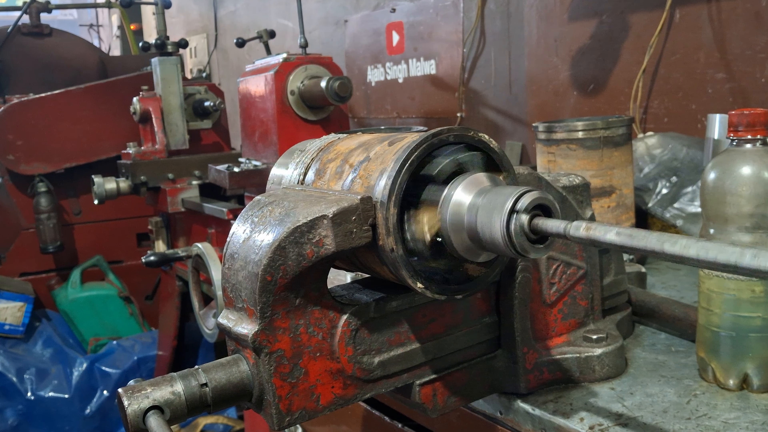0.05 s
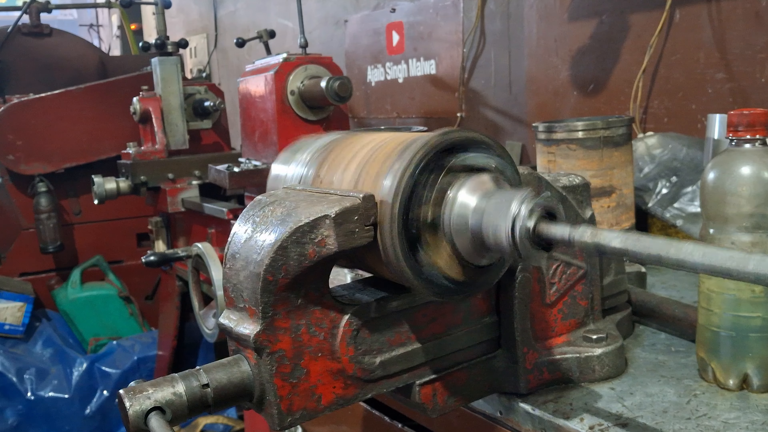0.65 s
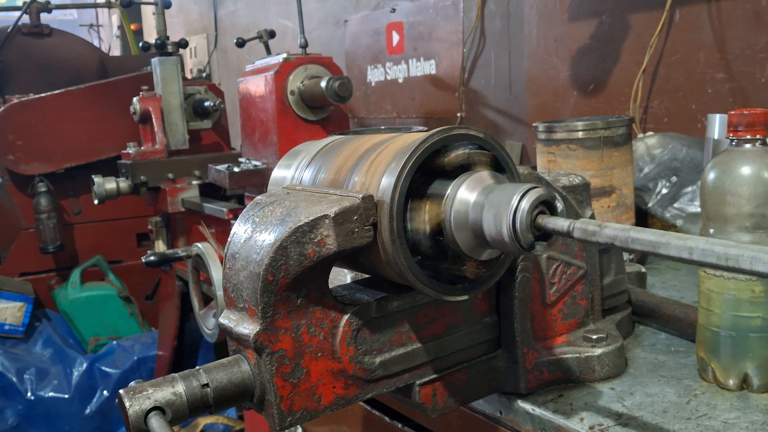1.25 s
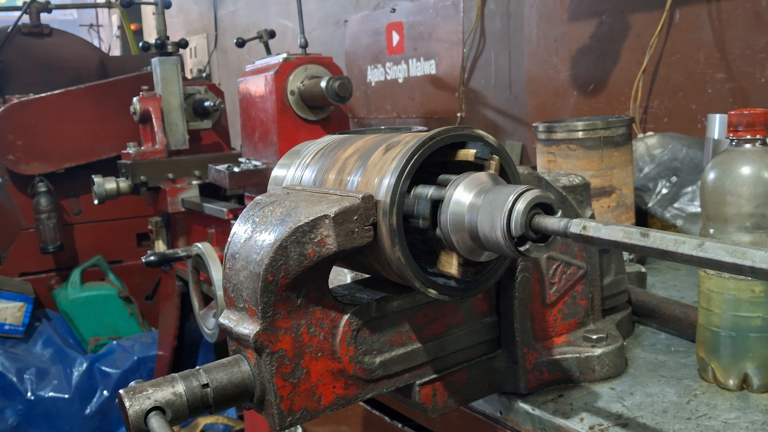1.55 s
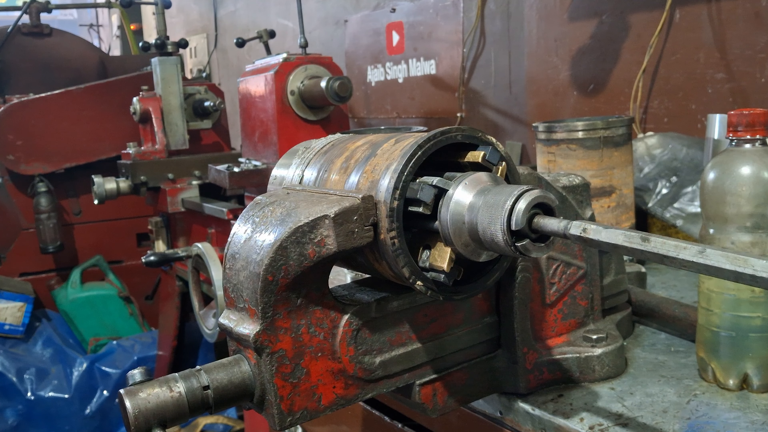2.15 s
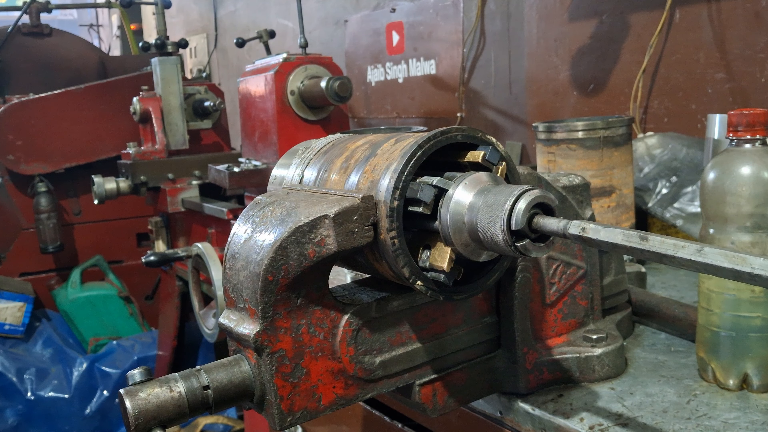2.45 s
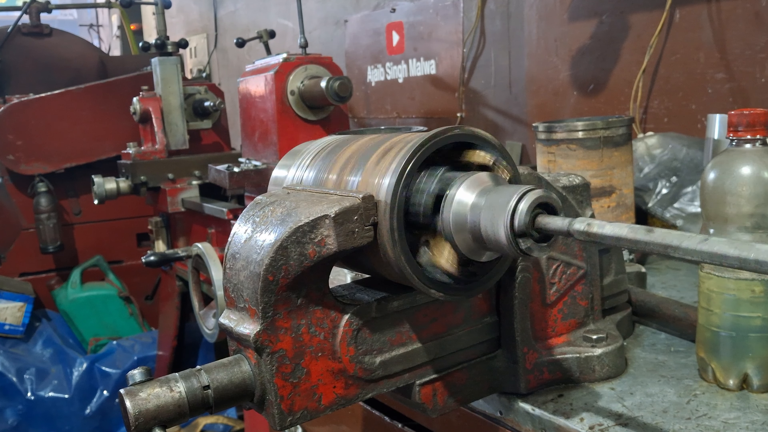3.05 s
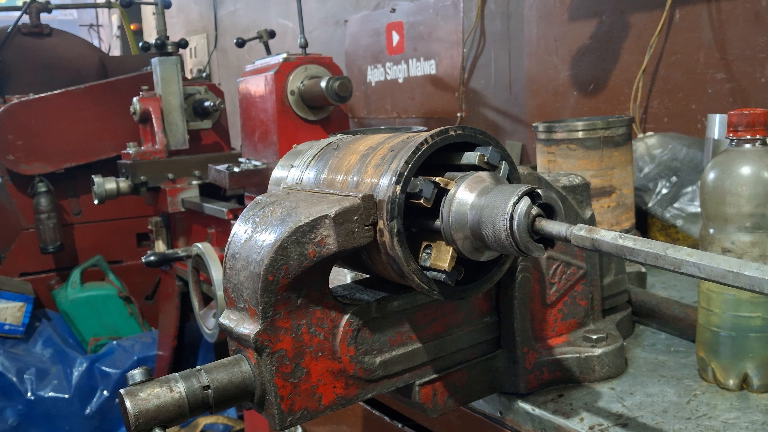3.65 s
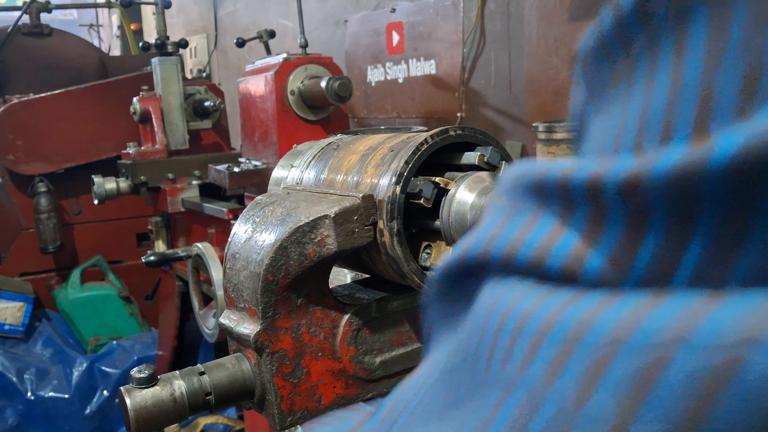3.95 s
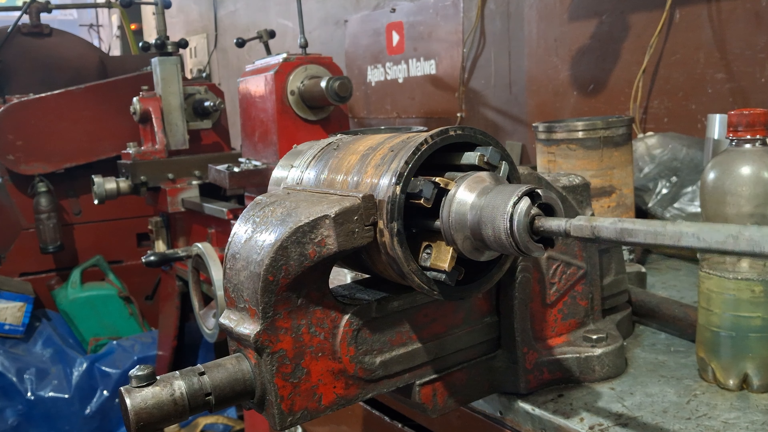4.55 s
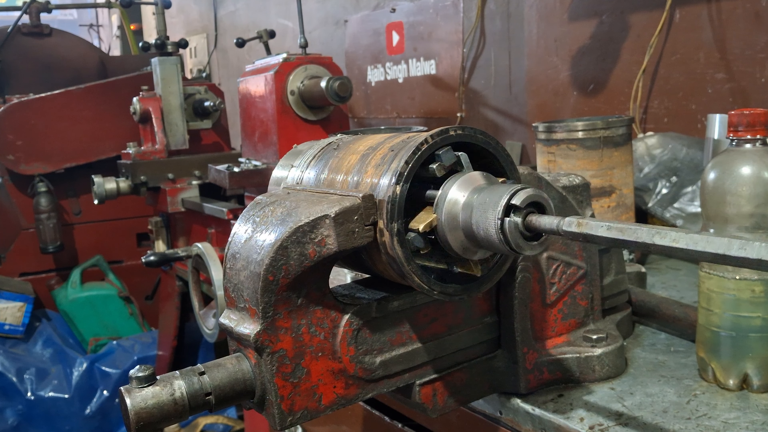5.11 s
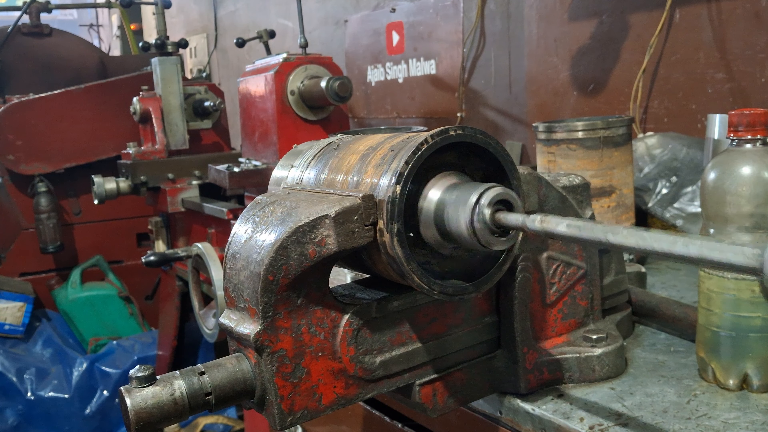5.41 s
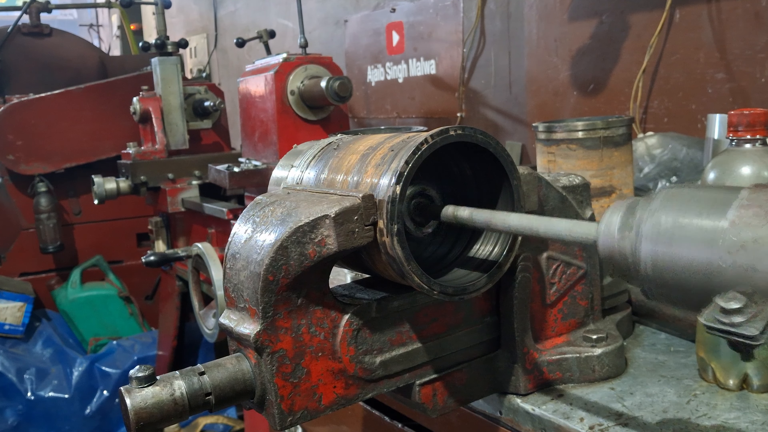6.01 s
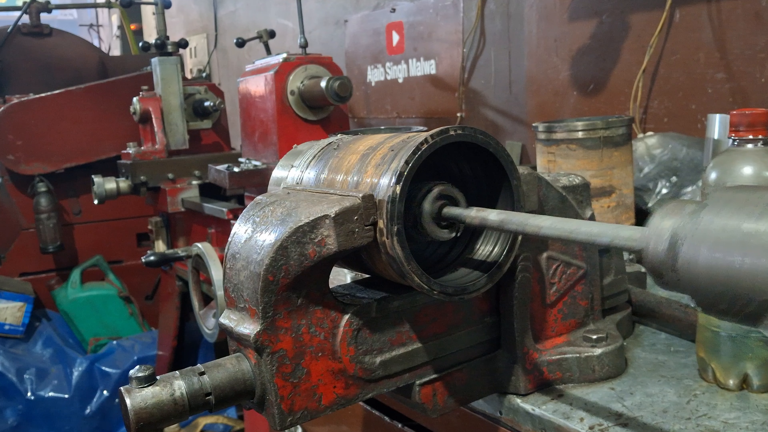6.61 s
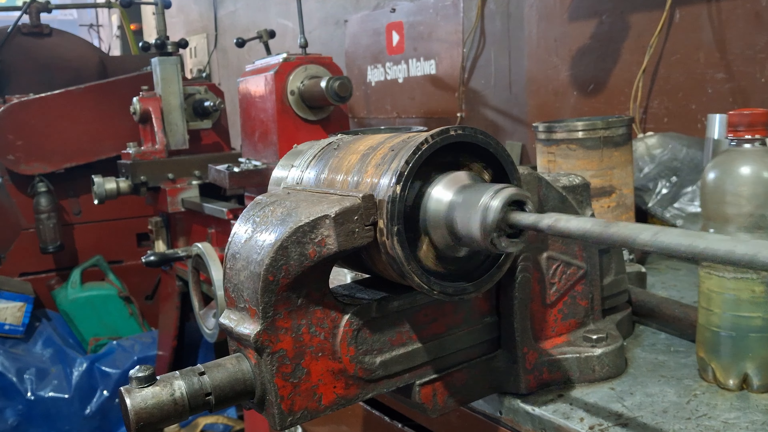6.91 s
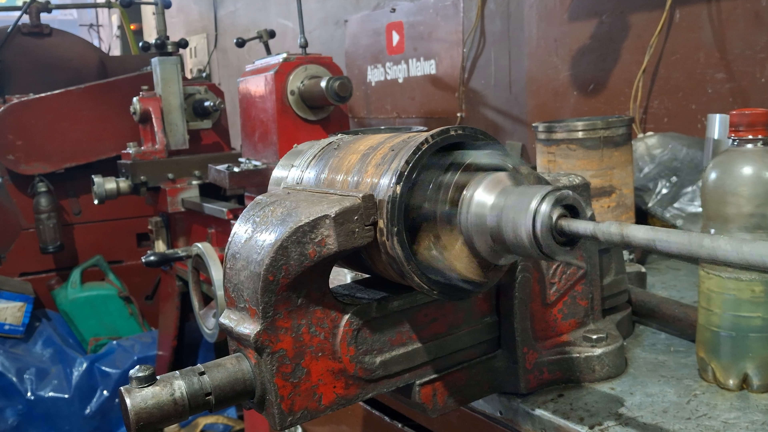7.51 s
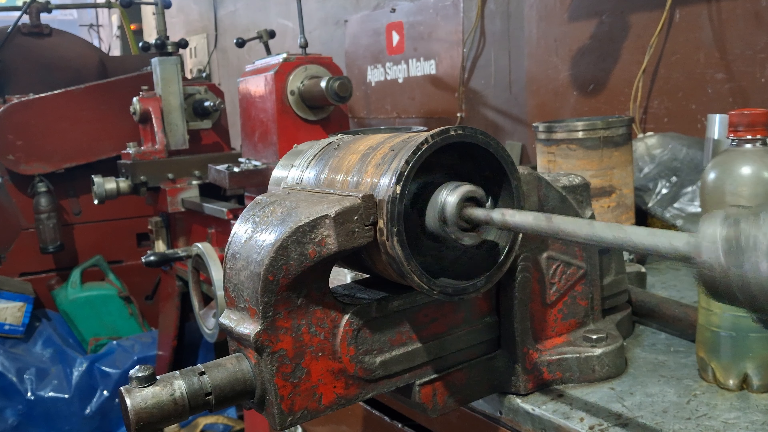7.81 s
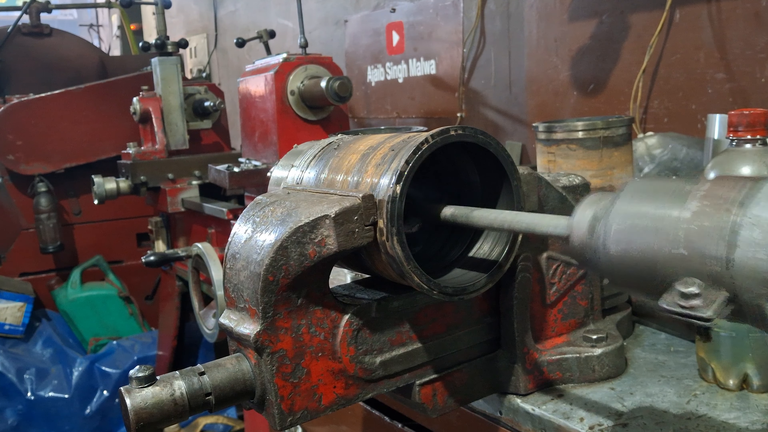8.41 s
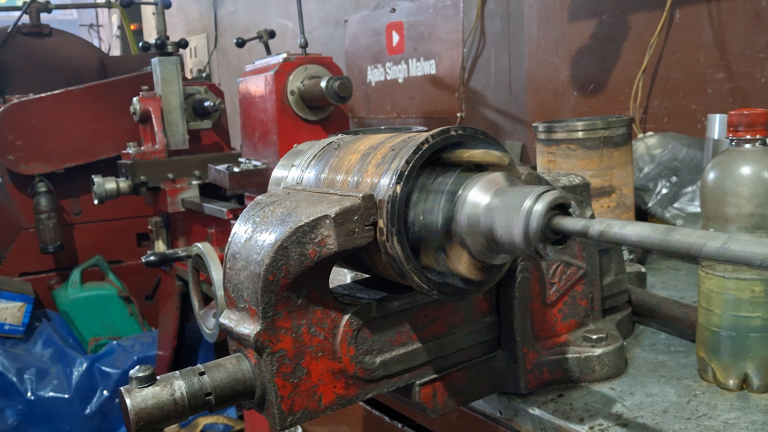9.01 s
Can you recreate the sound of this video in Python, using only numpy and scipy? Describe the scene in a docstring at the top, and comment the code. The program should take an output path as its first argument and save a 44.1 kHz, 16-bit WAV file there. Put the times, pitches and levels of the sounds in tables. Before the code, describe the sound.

Close up in a small workshop, a drill drives a hone through a metal cylinder, mixing gear whine with rasping grit. One short run coasts down, then come two quick blips, with light knocks, a faint distant whir and a shirt bumping the microphone between them. A long final run pulses rapidly, rising in pitch as the load eases and ringing more when the hone reaches the mouth.

```python
"""A drill whines up to speed, grinding an abrasive hone round a cylinder sleeve held in a vice.
One run and two short blips lead to a long run, stroked in and out. Meshing teeth make the whine;
grit scratches the bore and sets the sleeve ringing; once a turn the stones bind and pull the speed down.
In the pauses the tool knocks lightly, a shirt brushes the microphone and a far machine whirs
over the hum of the small workshop."""
import sys
import numpy as np
from scipy import signal
from scipy.fft import rfft, irfft, next_fast_len
from scipy.io import wavfile

SR = 44100
rng = np.random.default_rng(int(sys.argv[2]) if len(sys.argv) > 2 else 0)


def bounce(signal):
    """Save signal as a 16-bit WAV file at the path given by the first command-line argument."""
    frames = np.transpose(np.atleast_2d(signal))
    limited = np.clip(frames, -1, 1)
    pcm = np.round(limited * 32767).astype(np.int16)
    wavfile.write(sys.argv[1], SR, pcm)


N = 408366
TIME = np.arange(N) / SR
WORKING_SPEED = 121.3  # of the armature under load [turns/s]

# the sleeve rings most with the hone at its mouth: (time [s], relative ringing level [dB])
MOUTH_RINGING = [(0, 0), (.8, 0), (1.45, -4), (2.9, 4.5), (5.0, 0.5), (5.45, 1), (5.9, -4), (6.5, -17),
                 (7.2, -3), (7.6, -3), (8.2, -12), (8.6, -5), (9.2, -2.5)]


def from_db(db):
    """Amplitude ratio of a level in decibels."""
    return 10 ** (np.asarray(db) / 20)


def rms_one(x):
    """Normalisation to unit power."""
    return x / np.sqrt(np.mean(x ** 2) + 1e-20)


def read_curve(points, x):
    """Linear interpolation between (x, value) points."""
    return np.interp(x, *np.transpose(points))


def at_hz(points, hz):
    """Interpolation of a spectrum on a log-frequency axis."""
    f, value = np.transpose(points)
    return np.interp(np.log(np.maximum(hz, 1)), np.log(np.maximum(f, 1)), value)


def coloured(x, spectrum):
    """Zero-phase filtering by a curve of (frequency [Hz], gain [dB])."""
    size = next_fast_len(N + 4096)
    gain = from_db(at_hz(spectrum, np.fft.rfftfreq(size, 1 / SR)))
    return irfft(rfft(x, size) * gain, size)[..., :N]


def noise(spectrum, shape=N):
    """Filtered Gaussian noise of unit power; shape (2, N) gives two incoherent channels."""
    return rms_one(coloured(rng.standard_normal(shape), spectrum))


def drift(rate_hz):
    """Random modulation of unit variance, interpolated between rate_hz values a second."""
    knots = rng.standard_normal(8192)
    return np.interp(TIME * rate_hz, np.arange(len(knots)), knots) * np.sqrt(3 / 2)


def resonate(x, hz, width_hz):
    """Resonance: two like band-pass stages in cascade, each width_hz wide with unit peak gain."""
    r = np.exp(-np.pi * width_hz / SR)
    b = np.array([1, 0, -1]) * (1 - r * r) / 2
    a = [1, -2 * r * np.cos(2 * np.pi * hz / SR), r * r]
    return signal.lfilter(b, a, signal.lfilter(b, a, x))


def decay(start, t60):
    """Exponential damping: 60 dB lost every t60 seconds."""
    return (TIME >= start) * from_db(-60 * np.clip((TIME - start) / t60, 0, 3))


def swell(start, length_s, attack_s, release_s):
    """Envelope with linear attack, hold and exponential release."""
    attack = np.clip((TIME - start) / attack_s, 0, 1)
    return attack * np.exp(-np.clip((TIME - start - length_s) / release_s, 0, 20))


def swells(rows, attack_s, release_s):
    """Incoherent events add in power; each row is (time [s], duration [s], level [dB])."""
    powers = ((from_db(db) * swell(s, length, attack_s, release_s)) ** 2 for s, length, db in rows)
    return np.sqrt(sum(powers))


def from_right(x, lag_s=.0005):
    """Path difference: sound from the right reaches the left microphone later."""
    return np.array([np.interp(TIME - lag_s, TIME, x), x])


def workshop(x, t60, room_db):
    """Reverberation: cluttered walls add a dense, decaying tail to the direct sound."""
    age = TIME[:SR // 2]
    tail = rng.standard_normal((2, len(age))) * from_db(-60 * age / t60) * (age > .003)
    tail /= np.sqrt(np.sum(tail ** 2, axis=1, keepdims=True))
    return from_right(x) + from_db(room_db) * signal.fftconvolve(x[None], tail, axes=1)[:, :N]


def background(hum_hz=98):
    """Ambient sound: a far machine, electric hum and room noise from the right, plus a diffuse field."""
    # room noise: (frequency [Hz], relative level [dB])
    room_spectrum = [(15, -33), (25, -3.5), (107, -6), (173, -42), (240, -12), (313, -26.5), (433, -12.5),
                     (482, -7.5), (537, -19.5), (1450, -23.5), (1950, -22), (2920, -42.5), (15500, -49.5)]
    machine = far_machine()
    hum = from_db(-66.5 + 2.5 * drift(8)) * np.sin(2 * np.pi * hum_hz * TIME)
    direct = from_right(machine + hum + from_db(-59.5) * noise(room_spectrum))
    return direct + from_db(-61.5) * noise(room_spectrum, (2, N))


def far_machine(hz=233):
    """Two harmonics, randomly modulated in frequency and amplitude, make a passing whir."""
    phase = 2 * np.pi * np.cumsum(hz * (1 + .017 * drift(60))) / SR
    level = from_db(-53.5 + 3.5 * drift(30)) * swell(3.3, 1.4, attack_s=.12, release_s=.65)
    return level * (from_db(-2.5) * np.sin(phase) + np.sin(2 * phase))


def shuffling(attack_s=.083, release_s=.15):
    """Friction noise of someone shifting about: a mono rumble and a stereo rustle of cloth."""
    # movements: (time [s], duration [s], relative rustle level [dB], rumble level [dB])
    moves = np.array([(2.058, 0.72, -78, -51), (2.383, 0.16, -57, -43.5), (2.535, 0.092, -56.5, -46.5),
                      (2.713, .09, -63, -43), (3.266, 0.23, -62.5, -46), (3.613, 0.75, -75, -52),
                      (4.19, 0.05, -51.5, -41), (4.393, 0.11, -50.5, -35.5), (4.54, 0.18, -55.5, -43.5)])
    # rubbing cloth: (frequency [Hz], relative level [dB])
    cloth_spectrum = [(350, -39), (600, -5), (993, -8), (1990, -5), (2610, -10), (3110, -9.5),
                      (10400, -15.5), (15500, -11.5)]
    rumble = from_db(-61) + swells(moves[:, [0, 1, 3]], attack_s, release_s)
    rumble *= noise([(25, -16.5), (60, 7.5), (110, .5), (200, -9), (450, -9), (800, -20.5),
                     (3000, -45.5)])
    rustle = from_db(-72) + swells(moves[:, :3], attack_s, release_s)
    crinkle = from_db(9 + 2 * drift(45))
    return rumble, rustle * crinkle * noise(cloth_spectrum, (2, N))


def tool_knocks():
    """Damped impacts of the resting tool: a dull knock outlasts a bright tick."""
    # impacts: (time [s], knock level [dB], tick level [dB])
    impacts = [(2.035, -35, -67), (2.277, -42, -70), (2.422, -36.5, -62), (3.379, -42, -42),
               (4.427, -36.5, -34)]
    # dull knock: (frequency [Hz], relative level [dB])
    knock_spectrum = [(100, -21), (300, 5.5), (520, 3.5), (900, -1), (1400, -5), (2000, -15), (2800, -15.5),
                      (5000, -25), (12000, -67)]
    tick_spectrum = [(500, -16), (2000, 4), (7000, -7.5), (15000, -8)]
    knocks = sum(from_db(db) * decay(s, t60=.41) for s, db, _ in impacts)
    ticks = sum(from_db(db) * decay(s, t60=.074) for s, _, db in impacts)
    return knocks * noise(knock_spectrum) + ticks * noise(tick_spectrum)


def tool_scrape():
    """Sliding friction of the resting tool gives a short band of noise."""
    band = rms_one(resonate(rng.standard_normal(N), hz=3100, width_hz=800))
    return from_db(-45) * swell(2.38, .11, attack_s=.017, release_s=.015) * band


def handling():
    """Superposition of reverberant tool noises and rumble with the direct rustle of clothes."""
    tool = tool_knocks() + tool_scrape()
    rumble, rustle = shuffling()
    return workshop(tool + rumble, t60=.5, room_db=-8.5) + rustle


def shirt(left_db=-31, attack_s=.004, lowest_hz=42):
    """Air displacement: cloth bumps the right microphone with a damped low thump and a scuff."""
    # bumps: (time [s], thump level [dB], frequency [Hz], 60 dB decay time [s], scuff level [dB])
    bumps = [(4.218, -0.5, 84, 0.054, -24), (4.241, 6, 60, 0.0092, -17), (4.252, 1, 102, 0.056, -55),
             (4.44, -19, 112, 0.11, -43)]
    scuff = noise([(200, -.5), (600, -3), (1500, -16), (6000, -21), (15000, -25)])
    pressure = np.zeros(N)
    for start, thump_db, hz, t60, scuff_db in bumps:
        age = TIME - start
        thump = from_db(thump_db) * decay(start, t60) * np.clip(age / attack_s, 0, 1)
        rub = from_db(scuff_db) * decay(start, t60=.056) * np.clip(age / attack_s + .44, 0, 1)
        pressure += rub * scuff - thump * np.sin(2 * np.pi * hz * age)
    highpass = signal.butter(2, lowest_hz, "high", fs=SR, output="sos")
    return signal.sosfilt(highpass, pressure) * from_db([[left_db], [0]])


def bench_drone(effort, shudder, drone_db):
    """Forced vibration: the bench drones with the grinding and with its own brief shudders."""
    # bench vibration: (frequency [Hz], relative level [dB])
    bench_spectrum = [(25, -25), (55, -12), (80, 0), (97, 7.5), (118, -0.5), (170, -19.5), (400, -61)]
    return np.hypot(effort * from_db(drone_db), shudder) * from_db(-1.5) * noise(bench_spectrum)


def vice_shake(effort, shudder):
    """Forced vibration: half out of the bore, the hone shakes the vice."""
    drive = effort * from_db(2 * read_curve(MOUTH_RINGING, TIME) - 17)
    rumble = noise([(22, -26), (42, -9.5), (62, 2.5), (110, -14), (220, -6.5), (500, -31.5)])
    return np.hypot(drive, shudder * from_db(-7.5)) * rumble


def drive_growl(speed, effort, growl_db):
    """Speed-dependent noise: the drive growls when it labours or races."""
    # strain on the drive: (armature speed [turns/s], relative level [dB])
    strain = [(12, 6), (30, 0), (55, 1.5), (80, -10.5), (105, -13), (122, -11.5), (148, -4.5)]
    # growl: (frequency [Hz], relative level [dB])
    growl_spectrum = [(25, -24.5), (60, -2.5), (170, -4.5), (350, 1.5), (520, 9.5), (700, -0.5), (950, 0.5),
                      (1300, 8), (2500, -25)]
    return effort * from_db(read_curve(strain, speed) + growl_db + 2.5) * noise(growl_spectrum)


def spin(goal, start, release, rise_s, braking, creep_speed=30):
    """Inertia: the rotor nears its goal exponentially; released, it brakes evenly and creeps to rest."""
    driven = goal * (1 - np.exp(-np.maximum(TIME - start, 0) / rise_s))
    coasting = np.interp(release, TIME, driven) - braking * (TIME - release)
    creeping = creep_speed * np.exp(np.clip(coasting / creep_speed - 1, -20, 0))
    return np.where(TIME < release, driven, np.maximum(coasting, creeping))


def motor():
    """Less load, more speed: gives armature speed, its rise from eased load and the pull in force."""
    # trigger pulls: (start [s], release [s], rise time [s], braking [turns/s^2], time of least
    # binding [s], speed swing [ratio], gear swell [dB], relative whine, growl and drone levels [dB])
    pulls = [(.03, .89, .103, 203, .4185, .048, 2.5, -.5, 1, -15),
             (2.812, 2.975, .073, 335, 2.97, .003, .5, .5, 3, -11),
             (4.847, 5.0, .072, 420, 4.99, .003, .5, 2.5, -1, -10),
             (5.245, 9.4, .085, 300, 5.9441, .028, 4.2, -.5, -1, -19)]
    # the load eases: (time [s], speed gained [turns/s], half duration [s])
    easings = [(.87, 36, .115), (6.438, 25.7, .318), (7.566, 6.9, .216), (8.481, 21.9, .251)]
    ease = sum(gain * np.exp(-((TIME - s) / length) ** 2) for s, gain, length in easings)
    speeds = np.array([spin(WORKING_SPEED + ease, *pull[:4]) for pull in pulls])
    return speeds.max(axis=0), ease, np.array(pulls)[speeds.argmax(axis=0)].T


def grinding_effort(speed, powered, grip_speed=44.7, grip_range=8.6, surge_db=18.5):
    """Friction noise follows speed and surges as the stones grip on run-up; brief rises add in power."""
    # steady grinding: (armature speed [turns/s], level [dB])
    grind_law = [(1, -95), (4, -78), (8, -64), (14, -54), (30, -42.5), (45, -35), (60, -32), (90, -29),
                 (120, -26.7), (150, -27.3)]
    # brief rises in the drill's noise (opening hum, start-up jerks, stone catches, swells under load):
    # (time [s], duration [s], level [dB])
    rises = [(0, .05, -45), (.053, 0.019, -31.5), (.093, .02, -42), (.19, 0.016, -21), (.275, 0.045, -22),
             (.39, 0.015, -25.5), (.49, .15, -32.5), (1.425, 0.031, -35.5), (2.832, 0.023, -40),
             (2.945, 0.14, -27), (3.113, 0.031, -26), (4.862, 0.022, -37), (4.965, 0.059, -26),
             (5.04, 0.074, -26), (5.25, .04, -38), (5.42, .1, -26.5), (6.68, .17, -37), (7.62, .2, -38.5),
             (8.66, 0.18, -31.5)]
    grip = np.clip((speed - grip_speed) / grip_range, 0, 1)
    surge = powered * grip * np.clip(1 - speed / WORKING_SPEED, 0, 1)
    grind = from_db(read_curve(grind_law, speed) + surge_db * surge)
    return np.hypot(grind, swells(rises, attack_s=.0023, release_s=.0075))


def squeals(half_length_s=.013):
    """Stick-slip at the sleeve's mouth briefly drives a high mode."""
    # squeals of a catching stone: (time [s], level [dB])
    slips = [(.205, -39), (2.922, -24), (3.052, -22), (4.94, -20), (4.983, -23), (5.05, -20.5)]
    envelope = sum(from_db(db) * np.exp(-((TIME - s) / half_length_s) ** 2) for s, db in slips)
    return envelope * rms_one(resonate(rng.standard_normal(N), hz=4320, width_hz=140))


def stones(effort, load_db, grit_db=8, flutter_db=1.07, grain_db=1, judder_db=7.5):
    """Abrasion: grit tears tiny scratches in the bore, and juddering stones excite the sleeve's modes."""
    # scratching grit: (frequency [Hz], relative level [dB])
    grit_spectrum = [(300, -40.5), (1020, -4), (1380, -4.5), (1700, 6.5), (2200, 6), (2700, -0.5),
                     (3300, -2), (3900, 0), (5000, -3.5), (6500, -6), (9000, -8.5), (11500, -6.5),
                     (13000, -6.5), (15700, -7.5)]
    # sleeve modes: (frequency [Hz], stage bandwidth [Hz], relative level [dB])
    sleeve_modes = [(560, 247, -2), (1285, 370, -1.5), (1863, 210, 5.5), (4120, 1100, -8.5),
                    (5740, 380, -11), (7570, 1080, -9), (11600, 1200, -18.5)]
    # the sleeve swallows noise between its lowest modes: (frequency [Hz], gain [dB])
    sleeve_dips = [(740, 0), (880, -10), (1080, -10), (1250, -1), (1800, -2), (2100, -4), (2500, -1),
                   (3000, 0)]
    pressure = effort * from_db(.13 * load_db + flutter_db * drift(90))
    scratches = rng.standard_normal((2, N)) * from_db(grain_db * drift(800))
    hiss = from_db(grit_db) * rms_one(coloured(scratches, grit_spectrum))
    judder = scratches * from_db(judder_db * np.clip(drift(250), -2, 2))
    modes = sum(from_db(db) * resonate(judder, hz, width) for hz, width, db in sleeve_modes)
    ringing = from_db(read_curve(MOUTH_RINGING, TIME) - 1.5) * rms_one(modes)
    return coloured(pressure * (hiss + ringing), sleeve_dips)


def gears(speed, angle, swell_db, whine_db, powered, pinion_teeth=10, jitter=.007, backlash=.27):
    """Source and filter: the tooth-mesh tone and rougher orders sweep through housing resonances."""
    # housing response to the mesh tone: (frequency [Hz], gain [dB])
    mesh_response = [(380, -16.5), (460, 2), (800, 3.5), (1030, 3.5), (1170, 8.5), (1260, 9.5), (1340, 10),
                     (1420, 0.5), (1540, 9)]
    # housing response to the other orders: (frequency [Hz], gain [dB])
    housing_response = [(200, -14), (400, -8), (490, 0), (560, 2), (620, 2.5), (720, -1.5), (950, 0.5),
                        (1100, -1.5), (1260, -9), (1550, 3.5), (1770, -4), (1880, 5), (2020, -4.5),
                        (2200, 2), (2380, 1), (2600, -2.5), (2820, 5.5), (3200, -3.5), (4300, -6.5),
                        (7000, -32.5)]
    # gear tones: (multiple of armature speed [ratio], relative level [dB], share of swell [ratio],
    # hone angle at the peak [turns])
    orders = [(4, -8, .3, .25), (5, -9, .6, .3), (6, -16, .3, .6), (11.7, -9, .6, .25), (14, -6, .5, .7),
              (15, -5, 1.1, .12), (16, -13, .3, .3), (20, -4, 1.5, .38), (24, -15, .6, .3),
              (25, -15, .6, .15), (30, -6, 1, .17), (40, -13, .6, .35)]
    # below working speed the teeth chatter in their play, less when coasting
    chatter = backlash * np.clip((115 - speed) / 30, 0, 1) * np.maximum(powered, .45)
    phase = 2 * np.pi * np.cumsum(speed * (1 + jitter * drift(300))) / SR
    mesh = from_db(whine_db + at_hz(mesh_response, pinion_teeth * speed) + swell_db * np.sin(angle))
    whine = mesh * (1 + .16 * drift(120) + chatter * drift(350)) * np.sin(pinion_teeth * phase)
    # each order chirps at its own place in the turn, most with the hone deep in the bore
    depth = np.clip(-read_curve(MOUTH_RINGING, TIME) / 10, 0, 1.5)
    for order, db, share, place in orders:
        chirp_db = share * swell_db * (1 + .38 * depth) * np.cos(angle - 2 * np.pi * place)
        level = from_db(db - .24 + at_hz(housing_response, order * speed) + chirp_db)
        roughness = (1 + .42 * drift(110) + 2 * chatter * drift(450)) / np.sqrt(1 + 4 * chatter ** 2)
        whine += level * roughness * np.sin(order * phase + rng.uniform(0, 2 * np.pi))
    return np.sqrt(2) * whine


def drill(gear_ratio=11.0562, let_go_s=.0515, free_ease=36, free_db=-4, coast_db=-2, reload_s=.042):
    """Cyclic load: the stones bind once a turn, modulating gear pitch, gear level and grinding."""
    speed, ease, pull = motor()
    _, release, _, _, loose_s, swing, swell_db, whine_db, growl_db, drone_db = pull
    powered = np.clip(1 - (TIME - release) / let_go_s, 0, 1)
    effort = grinding_effort(speed, powered)
    hone_turns = np.cumsum(speed) / SR / gear_ratio
    angle = 2 * np.pi * (hone_turns - np.interp(loose_s, TIME, hone_turns))
    # binding stops when the hone runs free or coasts, and no two turns bind alike
    binding = powered * np.clip(1 - (ease / free_ease) ** 3, 0, 1)
    wavering_speed = speed * (1 + binding * swing * (np.cos(angle) + .2 * drift(35)))
    # a returning load presses the gears harder
    speed_lost = np.interp(TIME - reload_s, TIME, ease) - ease
    pressed_db = free_db * (powered - binding) + coast_db * (1 - powered) + .61 * binding * speed_lost
    whine = gears(wavering_speed, angle, np.sqrt(binding) * swell_db, whine_db, powered)
    # shudders of bench and vice: (time [s], duration [s], relative level [dB])
    shudders = [(.26, .12, -36), (.77, 0.3, -34.5), (1.15, 0.21, -45.5), (2.85, 0.037, -33),
                (3.05, 0.056, -38), (4.9, 0.02, -18), (5.07, 0.19, -32.5), (5.27, 0.11, -30),
                (5.61, 0.026, -39), (7.37, .04, -40)]
    shudder = swells(shudders, attack_s=.009, release_s=.04)
    body = effort * from_db(pressed_db) * whine + bench_drone(effort, shudder, drone_db)
    body += drive_growl(speed, effort, growl_db) + vice_shake(effort, shudder) + squeals()
    load_db = binding * swell_db * np.sin(angle)
    return workshop(body, t60=.17, room_db=-7.5) + stones(effort, load_db)


def scene():
    """Level difference: everything stands to the right, so the left side is quieter and duller."""
    # left microphone relative to right: (frequency [Hz], gain [dB])
    left_response = [(60, -11), (110, 1.5), (200, -2), (380, -3), (700, -4), (1290, -4), (2380, -4.5),
                     (4400, -5), (8120, -9.5), (15000, -9.5)]
    left, right = drill() + handling() + background()
    return np.array([coloured(left, left_response), right]) + shirt()


def record(dry):
    """Clipping and band limiting: peaks stop at full scale, then a steep low-pass cuts the top."""
    cutoff_hz = 15950
    lowpass = signal.ellip(10, .1, 70, cutoff_hz, fs=SR, output="sos")
    return signal.sosfilt(lowpass, np.clip(dry, -1, 1))


dry = scene()
out = record(dry)
bounce(out)
```